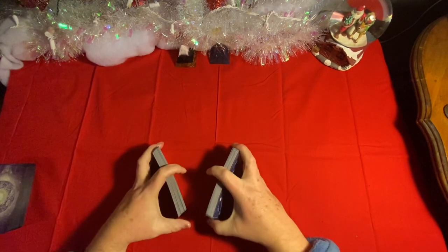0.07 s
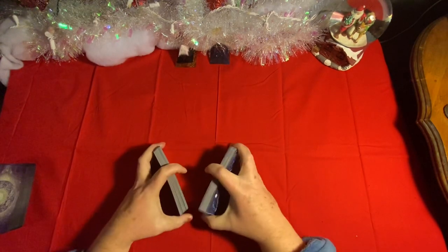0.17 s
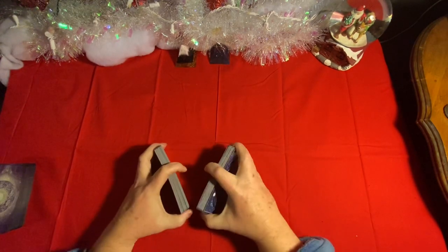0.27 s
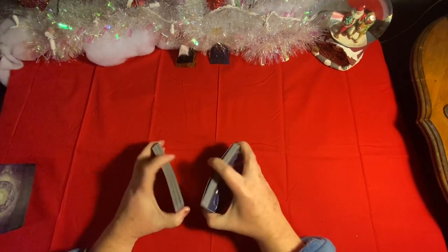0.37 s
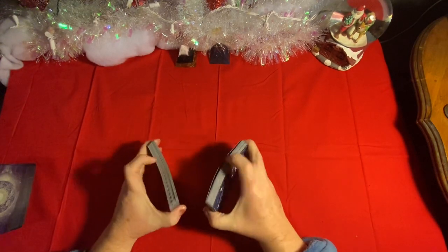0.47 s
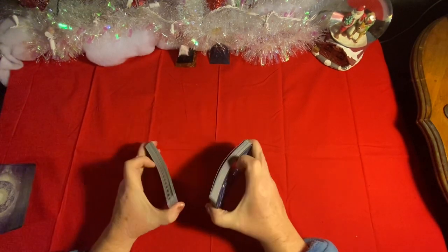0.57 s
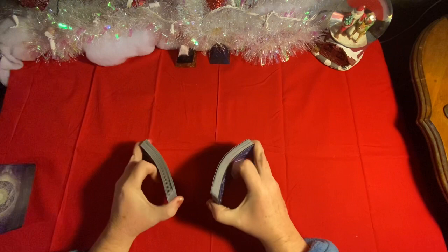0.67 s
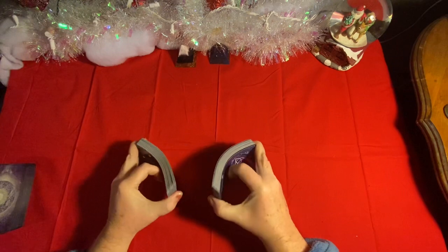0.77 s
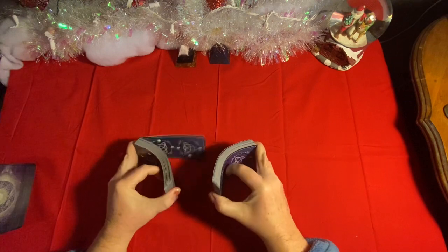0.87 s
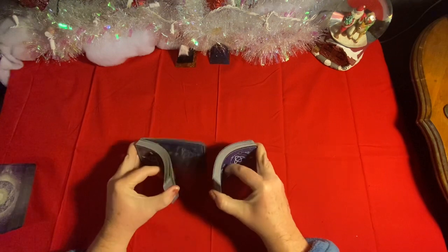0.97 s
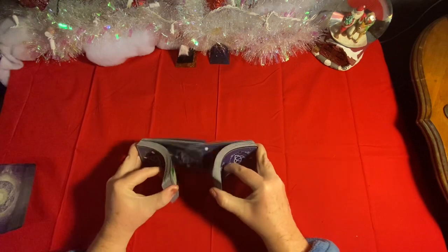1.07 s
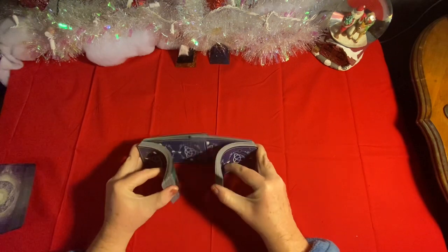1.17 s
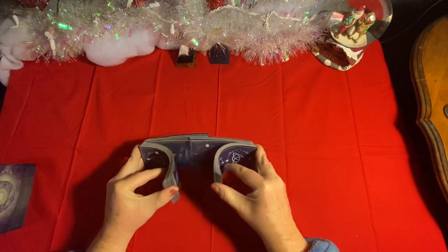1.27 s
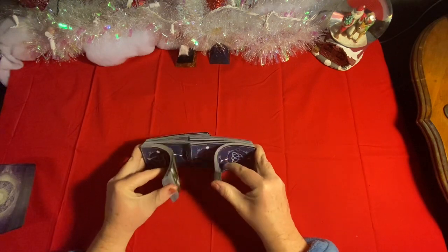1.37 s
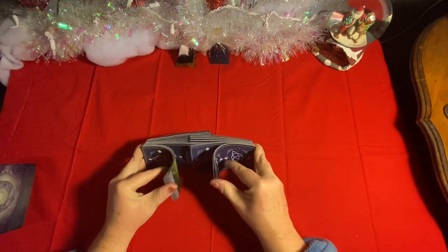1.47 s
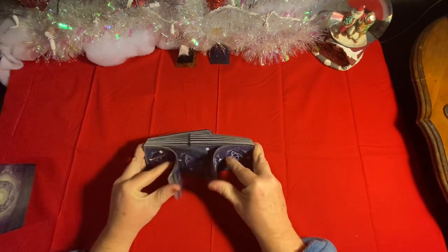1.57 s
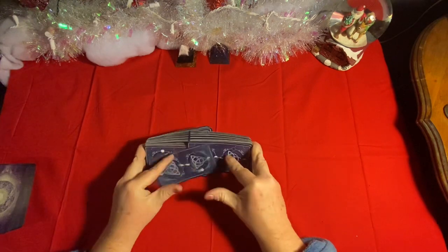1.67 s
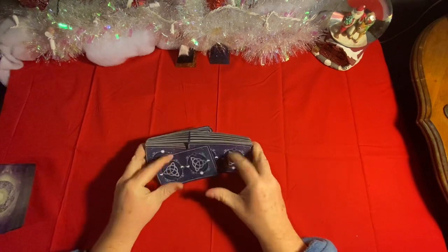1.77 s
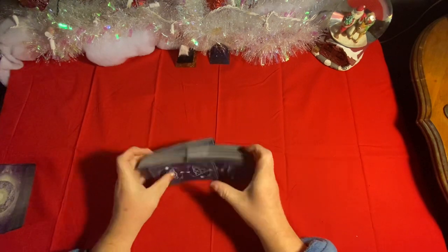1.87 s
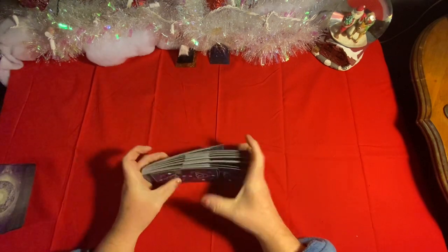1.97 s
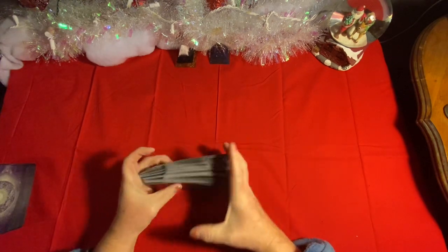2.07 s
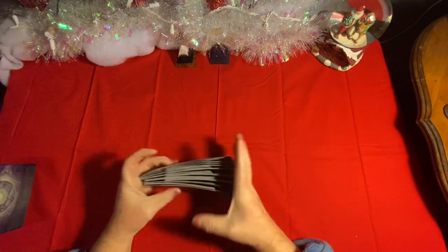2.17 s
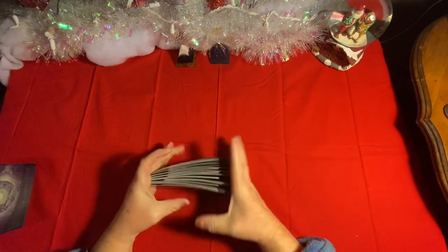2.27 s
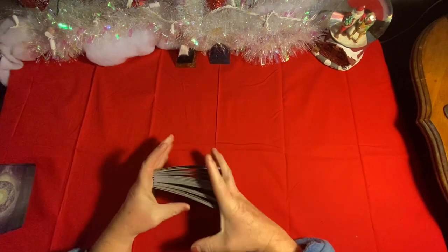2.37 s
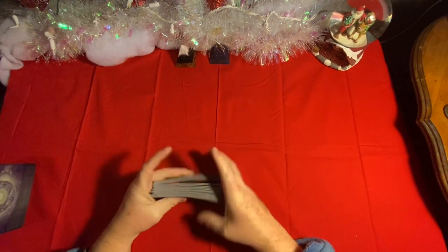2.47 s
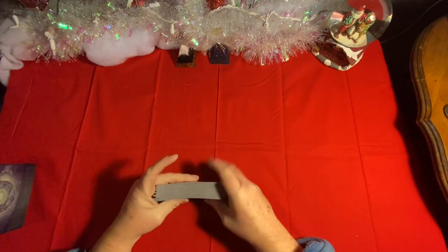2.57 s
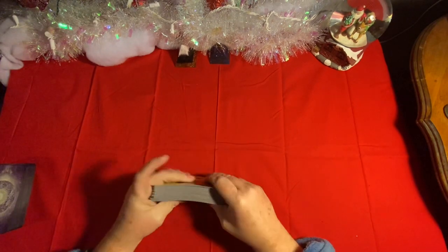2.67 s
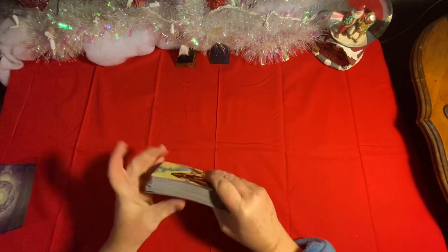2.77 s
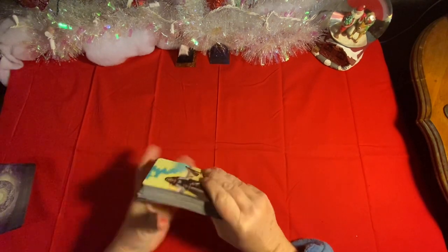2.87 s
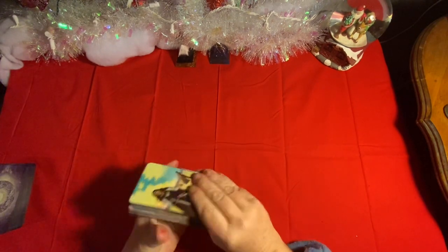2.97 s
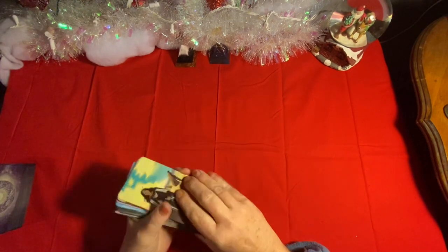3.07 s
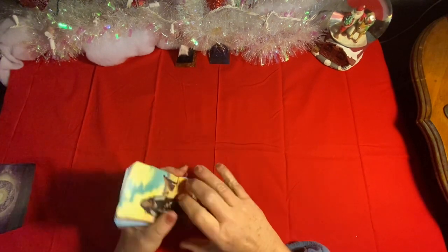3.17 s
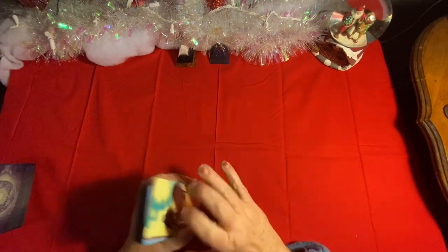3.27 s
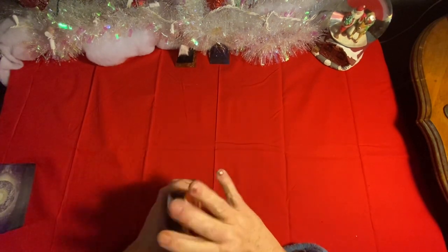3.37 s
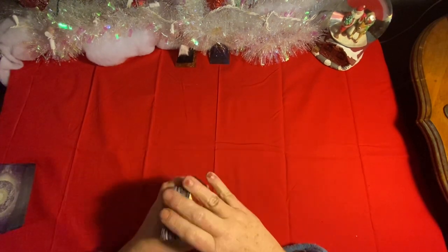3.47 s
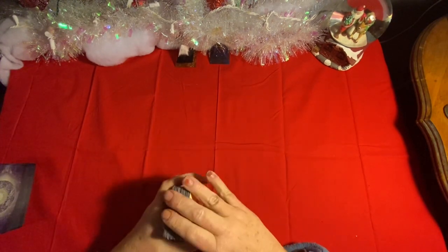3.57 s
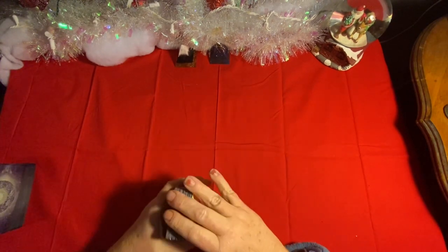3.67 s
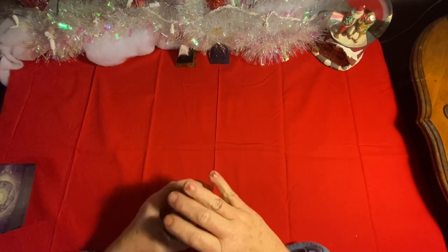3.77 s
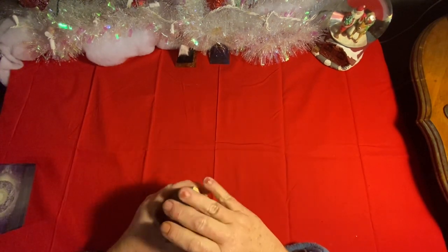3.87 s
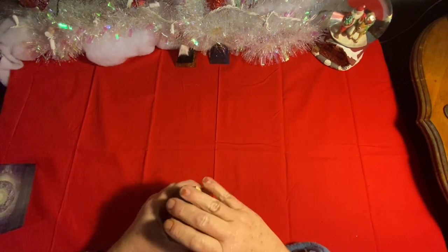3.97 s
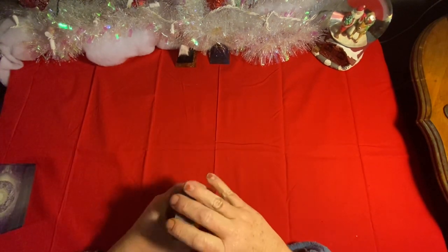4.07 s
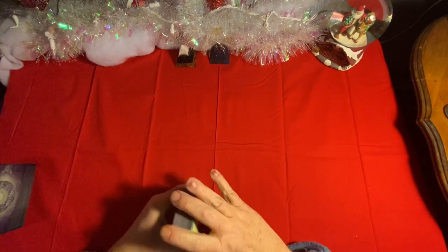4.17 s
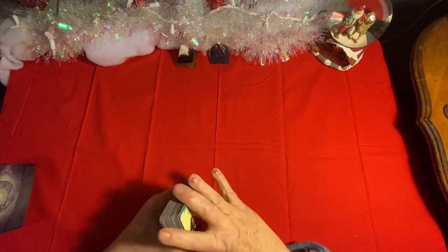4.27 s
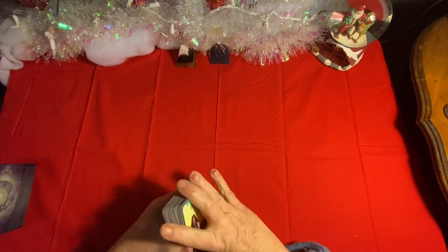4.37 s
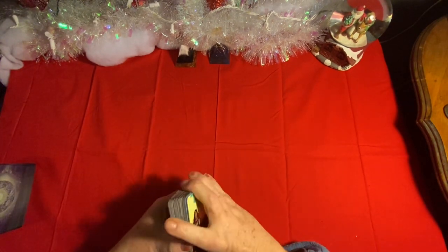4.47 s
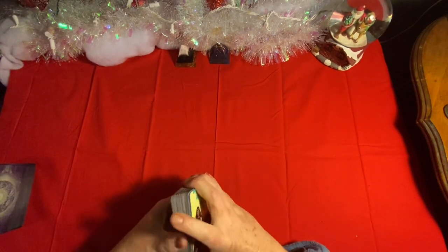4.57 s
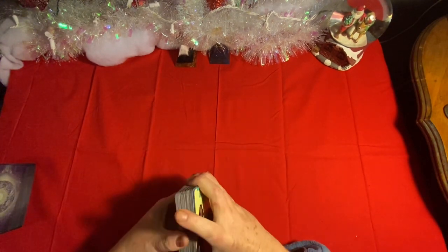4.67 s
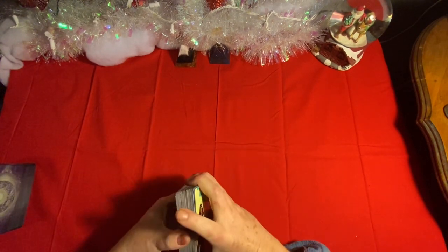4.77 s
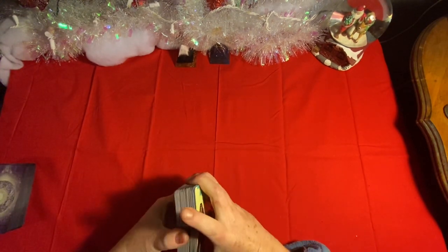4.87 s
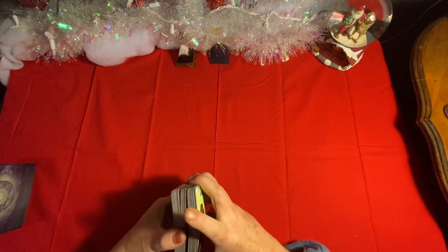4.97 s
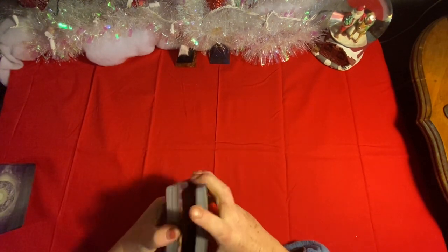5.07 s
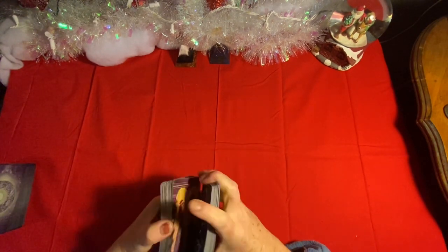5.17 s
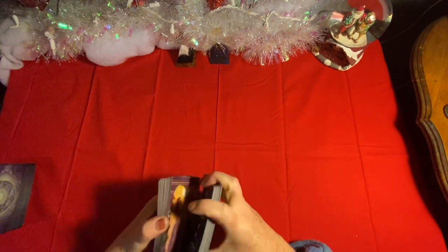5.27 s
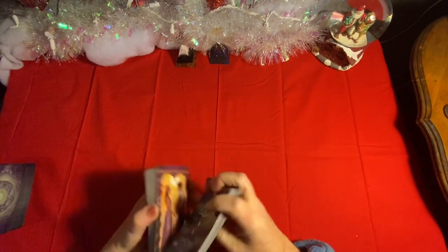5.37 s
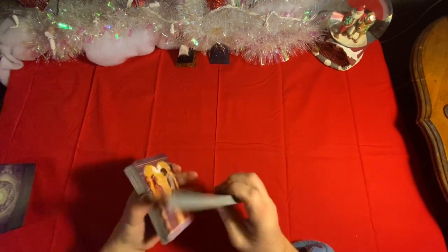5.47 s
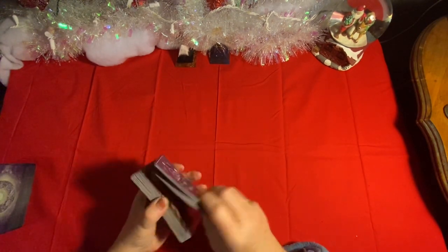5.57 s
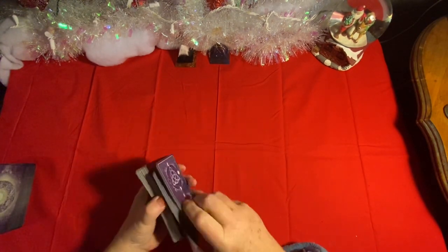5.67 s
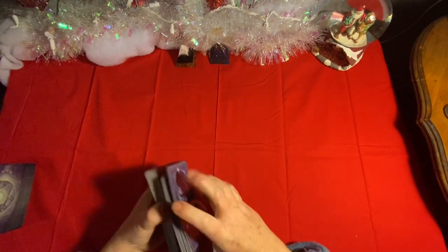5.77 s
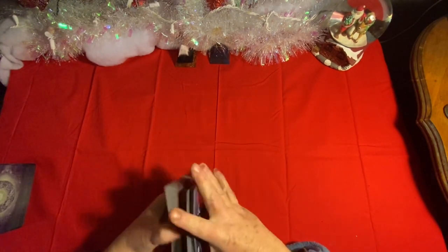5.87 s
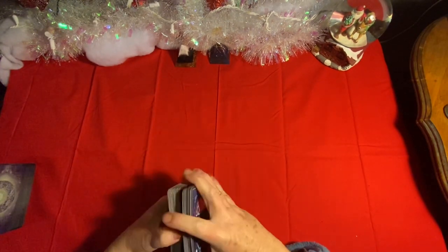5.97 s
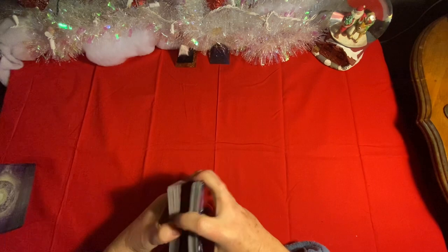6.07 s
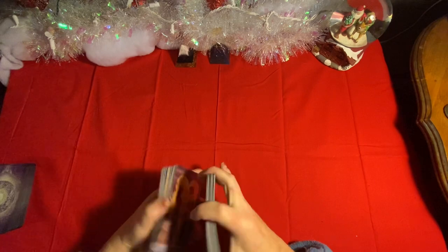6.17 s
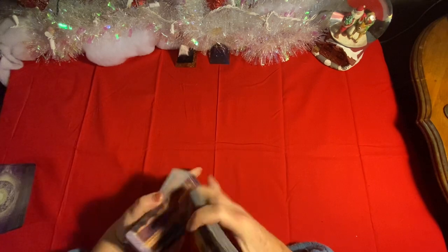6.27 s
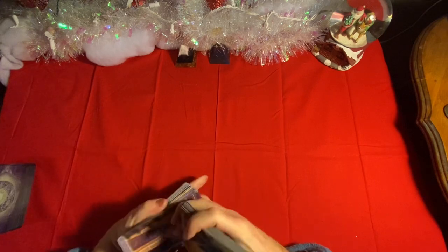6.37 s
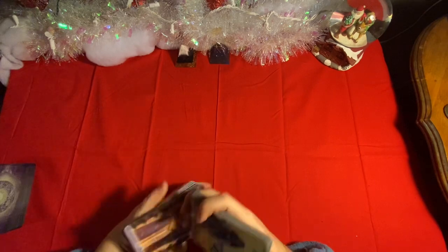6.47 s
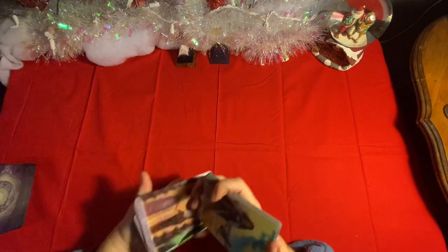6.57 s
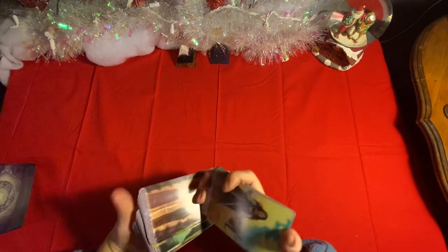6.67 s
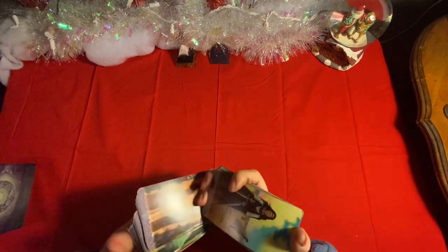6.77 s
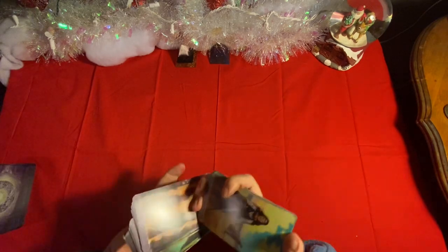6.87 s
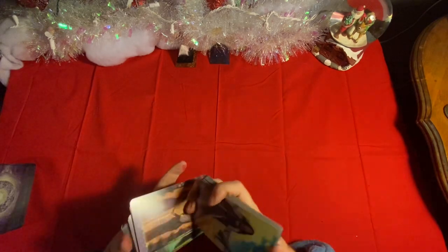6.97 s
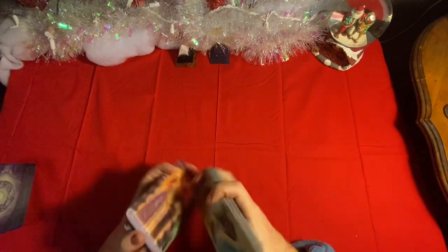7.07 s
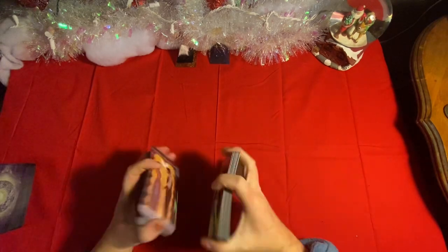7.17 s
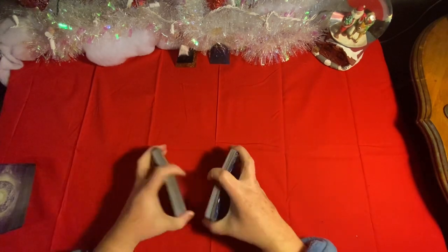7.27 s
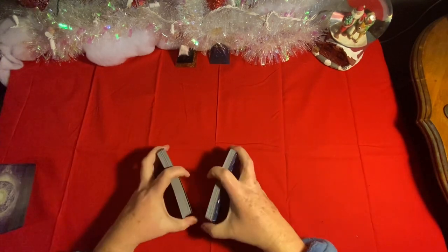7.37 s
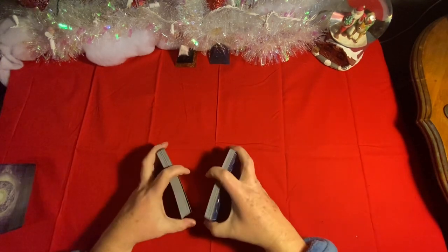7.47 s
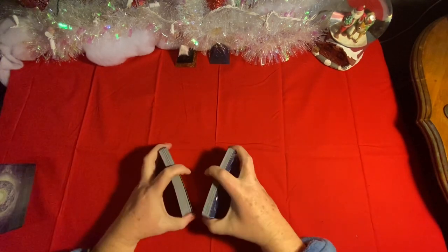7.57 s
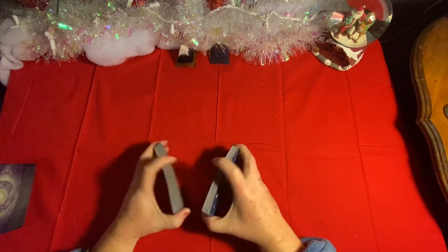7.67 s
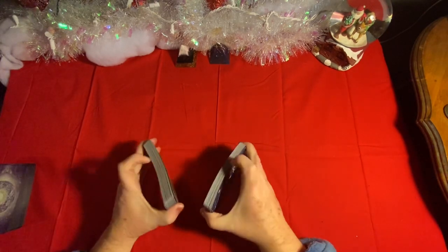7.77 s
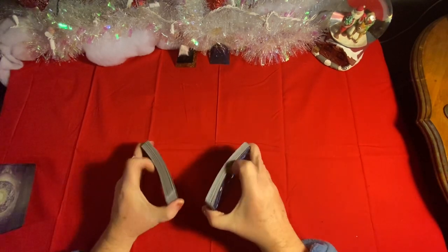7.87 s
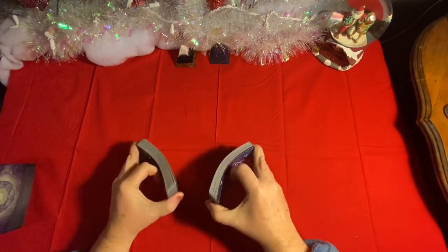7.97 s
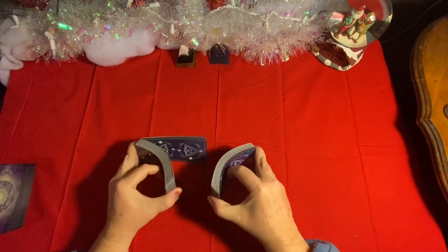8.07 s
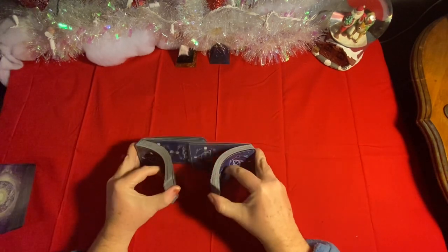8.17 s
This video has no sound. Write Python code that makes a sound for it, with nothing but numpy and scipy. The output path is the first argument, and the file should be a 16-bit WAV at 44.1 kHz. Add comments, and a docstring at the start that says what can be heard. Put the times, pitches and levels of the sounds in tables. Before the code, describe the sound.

A loud crisp riffle of stiff cards, then squaring rustles, soft boomy taps on a cloth-covered table, light slips and another riffle starting.

```python
"""At a cloth-covered table in a small room with a faint mains hum, heard close by in stereo.
Two half decks of stiff cards are riffled together, squared up and tapped on the table, cut, tapped again,
and a new riffle begins. Card edges snap as noise cracks with a short ring and a hissing flutter; the deck lands
as runs of soft clicks that boom in the table modes; grainy, filtered friction-like noise makes the rubs of cards
and fingers, faint breath-like swells and the hissing tails of the taps."""
import sys
import numpy as np
from scipy import signal
from scipy.fft import rfft, irfft, next_fast_len
from scipy.io import wavfile

SR = 44100
rng = np.random.default_rng(int(sys.argv[2]) if len(sys.argv) > 2 else 0)


def file_out(sig):
    """Save sig as 16-bit WAV at sys.argv[1]."""
    # one column per channel
    cols = np.atleast_2d(sig).T
    # limit, then scale
    lim = np.clip(cols, -1, 1)
    pcm = np.round(lim * 32767).astype(np.int16)
    wavfile.write(sys.argv[1], SR, pcm)


N = 361884  # length in samples

# Air of the room. Each row: frequency in Hz, density in dB per Hz (shape only; AIR_DB sets the level).
AIR_SPECTRUM = [(15, -27.5), (25, -6.5), (66, -1), (335, -17), (394, -16.5), (607, -21.5), (1400, -23.5),
                (2610, -33), (5570, -36), (10400, -43), (12200, -46.5), (13600, -41.5), (16000, -55)]
AIR_DB = -68  # rms
# Mains hum. Each row: frequency in Hz, middle level in dB rms.
HUM_LINES = [(59, -73), (118, -76), (177, -90.5), (236, -84.5)]
# Reverberation of the room. Each row: frequency in Hz, decay by 60 dB in seconds.
ROOM_DECAY = [(100, 0.33), (400, 0.24), (1000, 0.071), (3000, 0.13), (10000, 0.095)]
# Diffuse sound in the two channels. Each row: frequency in Hz, left-right likeness (correlation).
DIFFUSE_LIKENESS = [(60, 0.51), (250, 0.35), (700, 0.29), (3000, 0.1), (12000, 0.38)]
# Left-right phase by frequency. Each row: frequency in Hz, lead of the left channel in radians.
LEFT_LEAD = [(0, -1), (200, 0.63), (1640, 2.5), (2930, 4), (5170, 5.5), (7920, 10.5), (9300, 7.5),
             (11500, 4.5), (13600, 0.5), (16400, -0.5)]
# Left-right level by frequency. Each row: frequency in Hz, left minus right in dB.
LEFT_LEAN = [(60, 2), (180, -2.5), (550, 1.5), (1650, 3), (4970, 5.5), (15000, -2.5)]
# Table top modes. Each row: frequency in Hz, level in dB, decay by 60 dB in seconds.
TABLE_MODES = [(61.7, -4.5, 0.058), (74, -0.5, 0.07), (135.2, 1.5, 0.13), (146.5, -12, 0.33),
               (225, -7, 0.041), (280.2, -10, 0.12), (376.6, -12.5, 0.09)]
# Hands pressing and shifting on the table. Each row: start in seconds, length in seconds, rumble in dB.
HAND_PRESSES = [(0., 0.069, -56), (.18, 0.15, -56.5), (1.82, 0.043, -37.5), (1.9, 0.13, -51.5),
                (2.085, 0.018, -51), (2.27, 0.07, -45), (2.38, 0.13, -48), (2.54, 0.056, -52),
                (4.01, 0.048, -48.5), (7.45, 0.22, -59.5), (7.68, 0.18, -63.5)]
# Friction-like noise: rubs of cards and fingers, faint breath-like swells, hissing tails of the taps.
# Each row: start in seconds, length in seconds, hiss level in dB before the mix,
# body level relative to the hiss in dB.
RUB_STROKES = [(0.057, 0.36, -81.5, 18.5), (0.243, 0.072, -73, 10), (0.579, 0.022, -68, 0.5),
               (0.808, 0.39, -74.5, 18), (1.646, 0.077, -63, 15.5), (1.765, 0.12, -61, 3),
               (1.894, 0.14, -54, -21), (2.07, .06, -69, -9.5), (2.131, 0.023, -69.5, 17.5),
               (2.175, 0.009, -46, 28), (2.235, 0.078, -51, -4), (2.378, 0.083, -54.5, -4.5),
               (2.517, 0.069, -65.5, -5), (2.644, 0.043, -67, -12.5), (2.902, 0.046, -70.5, 4.5),
               (2.976, 0.092, -65.5, -7), (3.215, 0.081, -82, 9), (3.319, 0.084, -67.5, 2),
               (3.407, 0.029, -59, 12), (3.739, .04, -75.5, -11.5), (3.912, 0.023, -66, 4),
               (3.972, 0.071, -68.5, -6), (4.117, 0.03, -71, -9), (4.163, .03, -67.5, -12),
               (4.519, 0.013, -71.5, 8), (4.955, 0.099, -64, 1.5), (5.095, 0.018, -77.5, 19),
               (5.144, 0.025, -65, 9.5), (5.2, 0.1, -79.5, 14), (5.288, 0.091, -59, -3.5),
               (5.409, 0.05, -61.5, 1.5), (5.507, 0.15, -68.5, 5.5), (5.819, 0.04, -69.5, -2),
               (5.972, 0.082, -71.5, -5.5), (6.11, 0.034, -78, -3.5), (6.243, 0.1, -76.5, 4),
               (6.413, 0.075, -61.5, -5), (6.553, 0.22, -83, 17), (6.748, 0.17, -81, 22),
               (6.951, 0.065, -67.5, 1), (7.053, 0.12, -72.5, -10.5), (7.232, 0.025, -58.5, 29),
               (7.291, 0.13, -70.5, -0.5), (7.422, 0.18, -69, -7), (7.812, 0.023, -76.5, 5),
               (7.965, 0.016, -63.5, 4)]
# Colour of the friction-like noise. Each row: frequency in Hz, density in dB per Hz.
RUB_SPECTRUM = [(150, -35), (250, -6), (947, -2.5), (1130, -8.5), (1420, -0.5), (1630, -1), (2010, -5),
                (2400, -8), (10100, -8), (14300, -12), (16500, -52)]
# The deck landing on the cloth. Each row: start in seconds, knock in dB, boom in dB before the mix,
# boom tilt in dB per octave, duration of the contacts in seconds, softness cut in Hz.
DECK_TAPS = [(1.828, -37, -38.5, 5, 0.03, 805), (2.114, -38.5, -38, 9.5, 0.017, 984),
             (2.146, -24.5, -23.5, 7.5, .012, 1786), (2.160, -24, -25.5, 8.5, .022, 1500),
             (2.183, -21.5, -26.5, 4.5, .022, 2800), (2.419, -49.5, -47, 2, 0.0294, 1510),
             (3.314, -38.5, -43, 15, 0.012, 994), (3.333, -25.5, -39.5, 8.5, 0.0092, 1400),
             (3.341, -32.5, -27, 5.5, 0.0233, 1340), (3.41, -30.5, -31, -0.5, 0.0145, 1510),
             (3.451, -36.5, -30.5, -1, 0.01422, 1088), (3.899, -37, -22, 2, 0.0066, 1184),
             (3.908, -48, -20, -2, .03, 1240), (7.213, -24.5, -35, 8.5, 0.0088, 1300),
             (7.222, -15.5, -30.5, 13, 0.0083, 2020), (7.2305, -22, -27, 9.5, .02, 2327),
             (7.251, -30.5, -15.5, -9, .02, 1000), (7.294, -45, -41.5, -7.5, .022, 1590)]
# Card edges slipping off a thumb or another card. Each row: start in seconds, level in dB, card ring in Hz,
# flutter level relative to the snap in dB.
CARD_SNAPS = [(0.3024, -41.5, 1790, -7.5), (0.5797, -62, 880, -17), (0.748, -48, 1240, -10.5),
              (0.775, -43.5, 3650, -28), (0.82, -36, 1580, -5.5), (0.879, -35, 2500, -32),
              (0.899, -38, 9200, -15), (0.9229, -37.5, 5960, -30), (0.9563, -28, 4150, -14.5),
              (0.9824, -3, 4700, -22), (1.0236, -4, 5320, -23), (1.0487, -4, 2300, -19),
              (1.1036, -10, 6460, -13.5), (1.1176, -17, 5700, -36), (1.1523, -21, 990, -3),
              (1.191, -8, 1110, -12.5), (1.216, -10, 940, -10), (1.2334, -6.5, 2700, -25),
              (1.268, -5, 7240, -25), (1.297, -11.5, 1380, -15), (1.3579, -23.5, 1300, -4),
              (1.3806, -6, 1030, -11), (1.3906, -6, 860, -8), (1.4425, -21, 5830, -19.5),
              (1.452, -6, 3670, -27), (1.478, -2.5, 7200, -23), (1.509, -12, 2760, -11.5),
              (1.5418, -8.5, 2280, -17), (1.6007, -23, 4700, -10), (1.6107, -18, 1040, -1),
              (1.632, -22.5, 3400, -11), (1.8252, -28, 605, -0.5), (3.208, -51, 3630, -20.5),
              (3.9, -49.5, 3070, -14.5), (3.983, -53, 2000, -14), (4.169, -51, 8870, -16),
              (5.005, -36, 934, -15.5), (5.136, -45, 1280, 7), (5.3368, -48.5, 1850, -13),
              (5.442, -43, 3100, -12), (5.5062, -32, 1530, -19.5), (5.568, -42, 2870, -4.5),
              (5.576, -41, 2040, -6.5), (5.826, -66, 1693, -6), (5.8546, -50.5, 1328, -24.5),
              (5.981, -60.5, 1422, -7), (6.117, -62.5, 1338, -7), (6.4949, -42.5, 1695, -20),
              (6.5517, -45.5, 3590, -15.5), (6.762, -51, 1390, -5), (6.9908, -53.5, 5670, -19),
              (7.1333, -51, 3570, -20), (7.968, -46.5, 3820, -24), (8.0199, -31.5, 745, -6.5),
              (8.057, -38, 5440, -21), (8.089, -29.5, 6250, -19), (8.127, -9, 1460, -15.5),
              (8.1532, -13, 10600, -18.5), (8.1709, -14.5, 5430, -7)]
# Colour of snap and flutter. Each row: frequency in Hz, density in dB per Hz.
SNAP_SPECTRUM = [(120, -32), (200, -12.5), (382, -10.5), (468, -15), (961, -6.5), (1240, -5), (2210, -1.5),
                 (3560, -4.5), (5870, -2), (7190, -3), (10200, -2.5), (14800, -13.5), (16500, -35)]

# Strokes: slopes of start and end, and depth of the arch between them.
RISE_DB_PER_S, FALL_DB_PER_S, ARCH_DB = 1100.5, 349.5, 3
BODY_HZ = 2220  # border between the body and the hiss of a rub
# Flutter: decay time when as strong as its snap; a weaker one lasts longer by this share of its dB.
FLUTTER_T60_S, FLUTTER_LINGERS = 0.082, 0.32
# A falling card pushes the table: dB before the mix, growing faster than its snap, up to a limit.
SLAP_DB, SLAP_GROWS, SLAP_TOP_DB = -8, 1.296, -31
# A slip that is mostly flutter starts slowly; a clean snap faster by this share of the flutter's dB.
SMEAR_S, SMEAR_SHRINKS = .004, 0.96
PLACE_SPREAD_S = .00002  # cards snap at different places, so the lag between the channels varies
# Top of the crack as a multiple of the card ring; it sinks by this share of the snap's dB.
CRACK_REACH, CRACK_SOFTENS = 56, .45
CUTOFF_HZ = 17000


def amp(db):
    """dB to gain."""
    return 10 ** (np.asarray(db) / 20)


def rms_one(x):
    """Scale to rms 1."""
    return x / np.sqrt(np.mean(x ** 2) + 1e-24)


def at_hz(points, hz):
    """Read a table on a log-frequency axis."""
    table_hz, values = np.array(points).T
    return np.interp(np.log(hz + 1), np.log(table_hz + 1), values)


def fall(length, t60):
    """Exponential decay over a number of samples."""
    return amp(-60 * np.arange(length) / SR / max(t60, .001))


def add(out, s, piece):
    """Mix a piece in at time s."""
    i = round(s * SR)
    out[..., i:i + piece.shape[-1]] += piece[..., :N - i]


def butter(x, order, hz, kind="low"):
    """Butterworth filter."""
    return signal.sosfilt(signal.butter(order, hz, kind, fs=SR, output="sos"), x)


def colour(x, spectrum):
    """Causal (minimum-phase) filter with the given spectrum and unit energy."""
    cepstrum = irfft(np.log(amp(at_hz(spectrum, np.linspace(0, SR / 2, 4097)))))
    # folding the cepstrum forward in time makes the filter minimum-phase
    cepstrum[1:4096] *= 2
    cepstrum[4097:] = 0
    kernel = irfft(np.exp(rfft(cepstrum)))
    kernel = kernel / np.linalg.norm(kernel)
    return signal.fftconvolve(x, kernel[None], axes=1)[:, :x.shape[1]]


def diffuse(size):
    """White stereo noise whose left-right likeness depends on frequency."""
    mid, side = rfft(rng.standard_normal((2, size)))
    alike = np.clip(at_hz(DIFFUSE_LIKENESS, np.linspace(0, SR / 2, len(mid))), -.99, .99)
    pair = np.sqrt(1 + alike) * mid + np.sqrt(1 - alike) * side * [[1], [-1]]
    return irfft(pair / np.sqrt(2), size)


def ring(x, hz, t60):
    """Damped resonance: a unit click sets a sine of height 1 ringing."""
    r, w = amp(-60 / (t60 * SR)), 2 * np.pi * hz / SR
    return signal.lfilter([0, np.sin(w)], [1, -2 * r * np.cos(w), r * r], x + 1e-18)


def strokes(rows):
    """Gain over time of strokes (start s, length s, dB) that rise, arch over and die away."""
    t = np.arange(0, N + 64, 32) / SR
    gain = 0
    for s, length, db in rows:
        before, after = np.maximum(s - t, 0), np.maximum(t - s - length, 0)
        progress = np.clip((t - s) / length, 0, 1)
        arch = ARCH_DB * (2 * progress - .8) ** 2  # strongest at two fifths of the stroke
        gain = gain + amp(db - RISE_DB_PER_S * before - FALL_DB_PER_S * after - arch)
    return np.interp(np.arange(N) / SR, t, gain)


def room_tone(waver_db):
    """Dull steady air and a mains hum whose lines waver in level."""
    t, hum = np.arange(N) / SR, 0
    for hz, db in HUM_LINES:
        waver = np.interp(t, np.arange(100) / 10, rng.standard_normal(100))
        line = np.sqrt(2) * np.sin(2 * np.pi * (hz * t + rng.random()))
        hum = hum + amp(db + waver_db * waver) * line
    return amp(AIR_DB) * colour(diffuse(N), AIR_SPECTRUM) + hum


def room(x, first_s):
    """Reflections: diffuse noise from first_s on, each octave dying at its own rate."""
    length = SR // 2
    noise, tail = diffuse(length), 0
    for low in 40 * 2. ** np.arange(9):
        band = butter(noise, 1, [low, 2 * low], "band")
        tail = tail + band * fall(length, at_hz(ROOM_DECAY, low * 1.7))
    tail = tail * (np.arange(length) > first_s * SR)
    return signal.fftconvolve(x[None], tail / np.linalg.norm(tail[0]), axes=1)[:, :N]


def table(pushes, tilt_db):
    """The table top booms at its low modes; where it is struck tilts them towards the deep or the high ones."""
    rung = 0
    for hz, db, t60 in TABLE_MODES:
        rung = rung + amp(db + tilt_db * np.log2(hz / 100)) * ring(pushes, hz, t60)
    return butter(rung, 3, 52, "high")  # the top is too small to radiate deeper


def hands():
    """Soft uneven pressure, as noise, keeps the table modes murmuring."""
    return strokes(HAND_PRESSES) * rms_one(table(rng.standard_normal(N), tilt_db=-1.5))


def rubs(grains_per_s, spread_db, grain_share, clump_db, clumps_per_s):
    """Friction-like hiss with fine grains that come in louder and softer clumps, under the strokes."""
    t = np.arange(N) / SR
    clumps = amp(clump_db * np.interp(t * clumps_per_s, np.arange(2000), rng.standard_normal(2000)))
    # a spread of 0 dB makes all grains equal before the clumps weight them
    sizes = amp(spread_db * np.minimum(rng.exponential(1, N), 4)) * rng.choice([-1, 1], N)
    struck = rng.random(N) < clumps * grains_per_s / SR
    grains = rms_one(clumps * sizes * struck)
    share = np.clip(grain_share, 0, 1)
    rub = colour(np.sqrt(share) * grains + np.sqrt(1 - share) * diffuse(N), RUB_SPECTRUM)
    body, hiss = butter(rub, 2, BODY_HZ, "low"), butter(rub, 2, BODY_HZ, "high")
    hiss_gain = strokes([(s, length, db) for s, length, db, _ in RUB_STROKES])
    body_gain = strokes([(s, length, db + body_db) for s, length, db, body_db in RUB_STROKES])
    return hiss_gain * hiss - body_gain * body  # opposite signs where the two bands meet


def taps(contacts_per_s, first, low_hz, tick_db, rattle, middle, push_hz):
    """Uneven card edges land one after another: soft clicks on the cloth, and pushes that boom in the table."""
    knocks, booms, length = np.zeros(N), np.zeros(N), SR // 2
    for s, knock_db, boom_db, tilt_db, last_s, soft_hz in DECK_TAPS:
        chance, size = rng.random(length), rng.standard_normal(length)
        window = np.clip((last_s - np.arange(length) / SR) / 0.0015 + .5, 0, 1)
        window *= 1 + first * fall(length, 0.0072)  # the leading edge lands hardest
        clicks = size * (chance < contacts_per_s / SR) * window
        clicks /= np.linalg.norm(clicks)

        soft = butter(clicks, 3, [low_hz, soft_hz], "band") * np.sqrt(SR / 2 / soft_hz)
        ticks = amp(tick_db) * signal.lfilter([1], [1, -.6], clicks)
        add(knocks, s, amp(knock_db) * np.sqrt(last_s * SR) * (soft + ticks))

        main_push = np.arange(length) == round(middle * last_s * SR)
        pushes = rattle * clicks + main_push  # the main push among lesser ones
        pushes = butter(pushes, 2, push_hz)  # the cloth cushions it
        add(booms, s, amp(boom_db) * table(pushes, tilt_db))
    return knocks, booms


def snaps(crack_t60, ring_cycles, ring_db, tint_cycles, tint_db, gentle, reach, bend_db):
    """A crack of noise, a brief ring of the card, a hissing flutter; also the pushes given to the table."""
    out, pushes, length = np.zeros((2, N)), np.zeros(N), SR // 3
    norm = np.linalg.norm
    for s, peak_db, hz, flutter_db in CARD_SNAPS:
        smear_s = .0008 + SMEAR_S * amp(SMEAR_SHRINKS * flutter_db)
        rise = np.minimum(np.arange(length) / (smear_s * SR), 1)

        crack = rng.standard_normal(length) * fall(length, crack_t60 + 3.0 * smear_s) * rise
        bend = ring(crack, hz, 1.5 / hz)  # each card lends the crack a broad colour of its own
        crack = crack + amp(bend_db) * bend * norm(crack) / norm(bend)
        card = ring(crack, hz, ring_cycles / hz)  # gentle slips ring more, hard ones are mostly crack
        crack = crack + amp(ring_db - gentle * peak_db) * card * norm(crack) / norm(card)
        soft = np.exp(-2 * np.pi * CRACK_REACH * amp(CRACK_SOFTENS * peak_db) * hz / SR)
        crack = signal.lfilter([1], [1, -2 * soft, soft ** 2], crack)
        crack = crack * 4.89 / norm(crack)

        hiss = diffuse(length)
        tint = rms_one(ring(hiss, hz, tint_cycles / hz))  # the flutter keeps the card's colour
        hiss = hiss + amp(tint_db - gentle * peak_db) * tint
        chatter = np.interp(np.arange(length) / SR * 150, np.arange(80), rng.standard_normal(80))
        lumps = amp(6.0 * chatter)  # it chatters unevenly
        lumps = lumps / np.mean(lumps[:SR // 40])
        decay = fall(length, FLUTTER_T60_S * amp(-FLUTTER_LINGERS * flutter_db))
        flutter = amp(flutter_db) * hiss * lumps * decay * rise
        dull = np.exp(-2 * np.pi * reach * hz / SR)  # a card that rings low also flutters duller
        flutter = signal.lfilter([1 - dull], [1, -dull], flutter)

        piece = amp(peak_db) * (crack + flutter)
        lag = PLACE_SPREAD_S * rng.uniform(-1.1, 1)
        add(out[0], s + lag, piece[0])
        add(out[1], s, piece[1])
        slap_db = min(SLAP_GROWS * peak_db + SLAP_DB, SLAP_TOP_DB)
        add(pushes, s + 0.0043, np.atleast_1d(amp(slap_db)))
    return colour(out, SNAP_SPECTRUM), pushes


def scene():
    """All sources on the table, their reflections and the room tone."""
    rub = amp(2.5) * rubs(grains_per_s=430, spread_db=0.0, grain_share=0.42, clump_db=2.5, clumps_per_s=70)
    knocks, booms = taps(contacts_per_s=2500, first=3.1, low_hz=165, tick_db=-29.0,
                         rattle=0.38, middle=0.37, push_hz=400)
    cards, slaps = snaps(crack_t60=0.0105, ring_cycles=30, ring_db=-15.0, tint_cycles=1.4, tint_db=-7.5,
                         gentle=0.16, reach=4.7, bend_db=-2.5)
    booms = amp(1.0) * booms + table(amp(-1.5) * slaps, tilt_db=1.5) + hands()
    card_echo = amp(-10.5) * room(cards[1] + rub[1], first_s=0.0035)
    table_echo = room(amp(-5.5) * knocks + amp(-19.0) * booms, first_s=0.0004)
    return cards + rub + knocks + booms + card_echo + table_echo + room_tone(waver_db=5.5)


def record(dry):
    """The two channels differ in phase and level; the deep bass rolls off and the top is cut."""
    size = next_fast_len(N + 2000)
    hz, side = np.linspace(0, SR / 2, size // 2 + 1), np.array([[.5], [-.5]])
    lead = np.interp(hz, *np.transpose(LEFT_LEAD))
    pair = amp(side * at_hz(LEFT_LEAN, hz)) * np.exp(1j * side * lead)
    dry = irfft(rfft(dry, size) * pair, size)[:, :N]
    dry = butter(dry, 4, 45, "high")
    dry = dry / (1 + np.abs(dry / .95) ** 4) ** .25  # the loudest peaks are rounded
    return signal.sosfilt(signal.cheby2(12, 70, CUTOFF_HZ, fs=SR, output="sos"), dry)


dry = scene()
out = record(dry)
file_out(out)
```